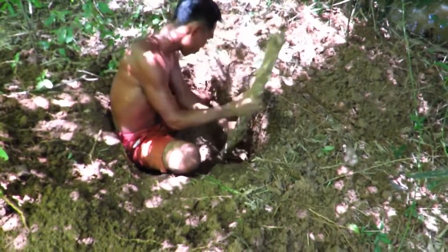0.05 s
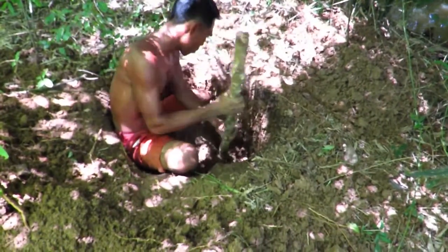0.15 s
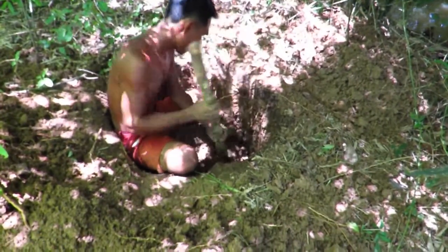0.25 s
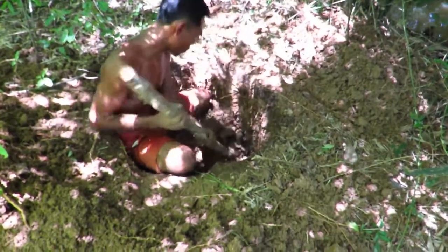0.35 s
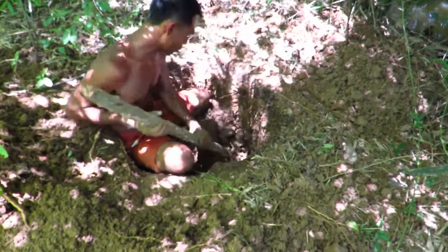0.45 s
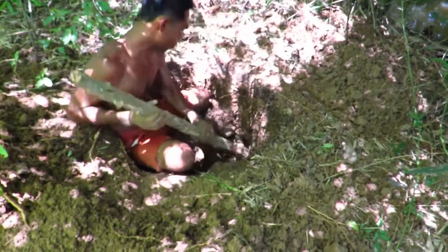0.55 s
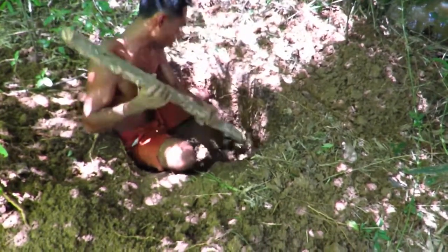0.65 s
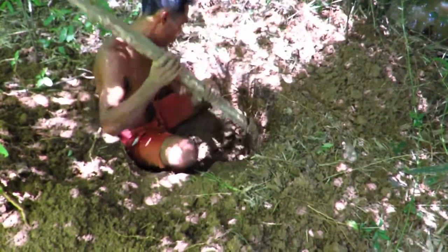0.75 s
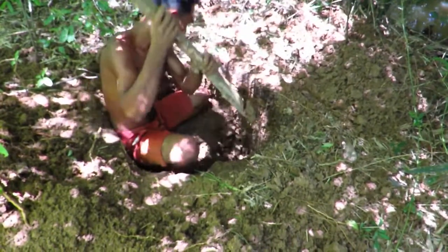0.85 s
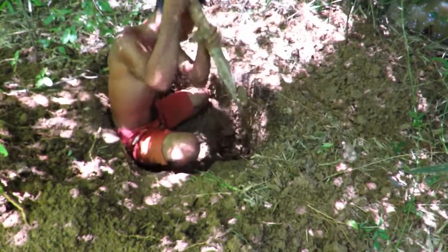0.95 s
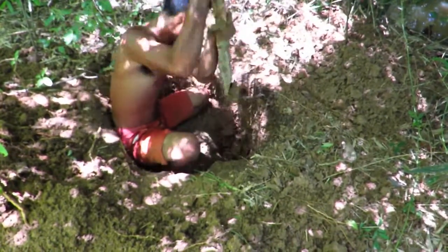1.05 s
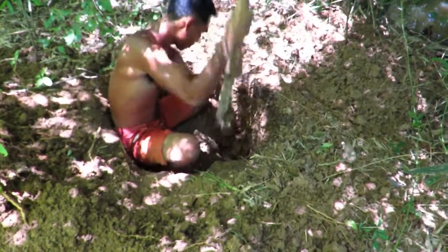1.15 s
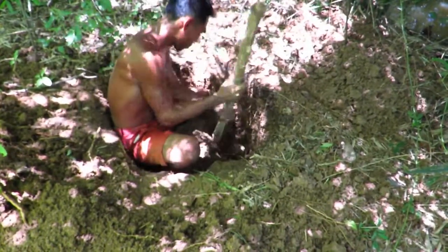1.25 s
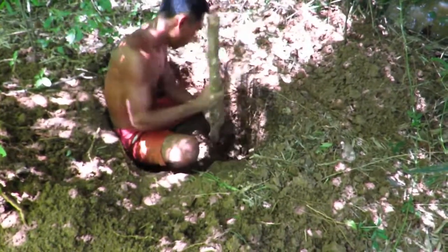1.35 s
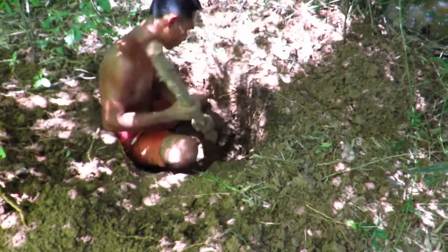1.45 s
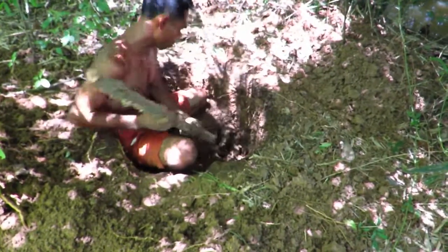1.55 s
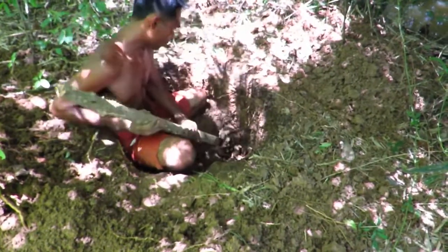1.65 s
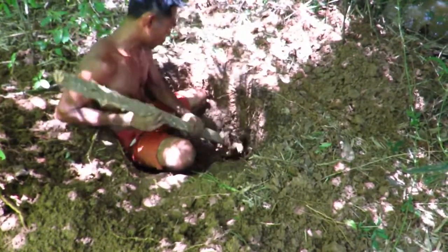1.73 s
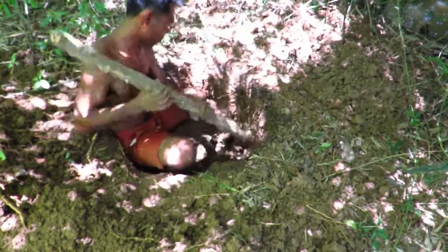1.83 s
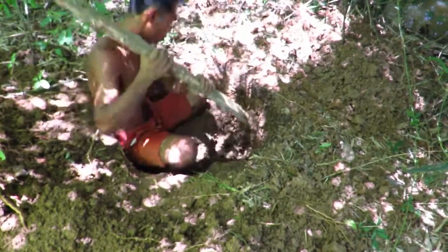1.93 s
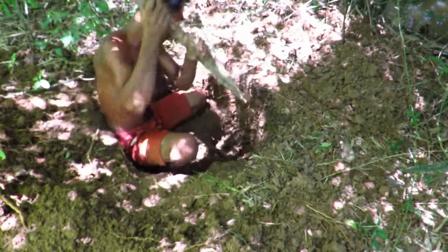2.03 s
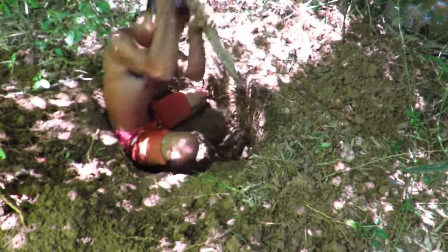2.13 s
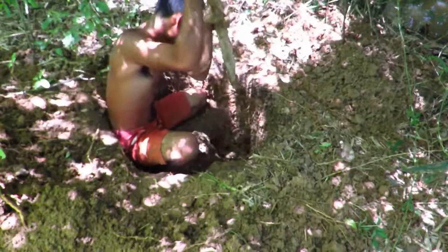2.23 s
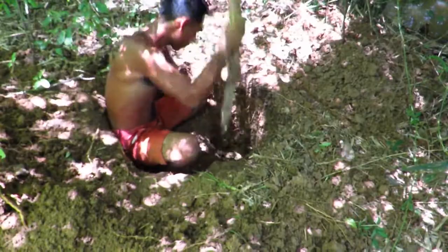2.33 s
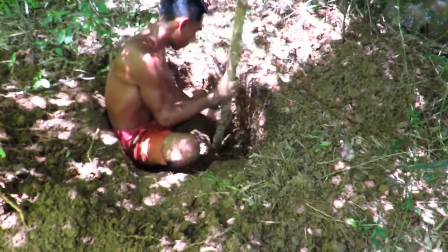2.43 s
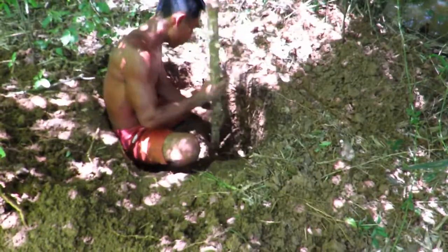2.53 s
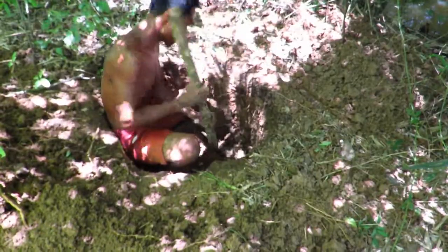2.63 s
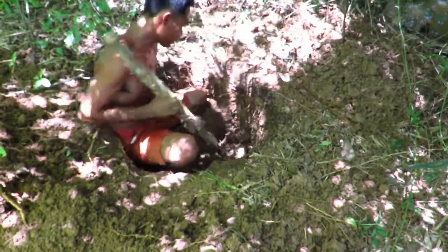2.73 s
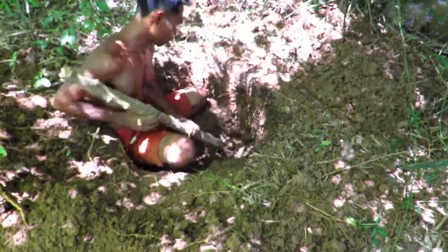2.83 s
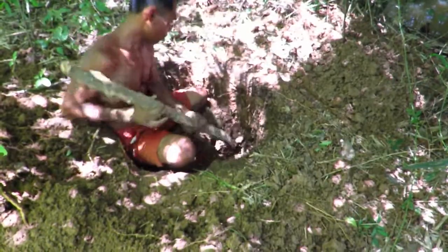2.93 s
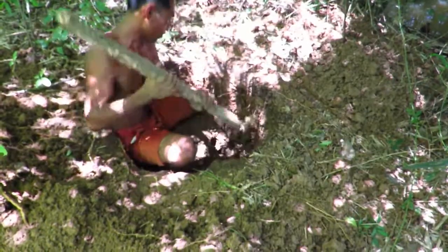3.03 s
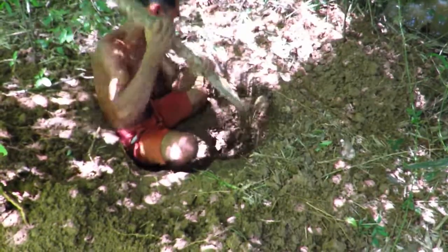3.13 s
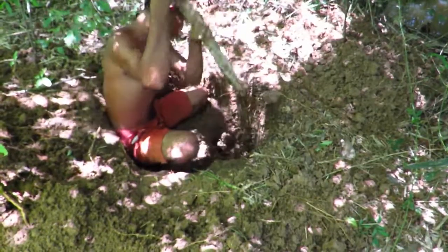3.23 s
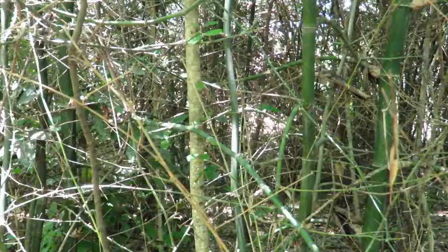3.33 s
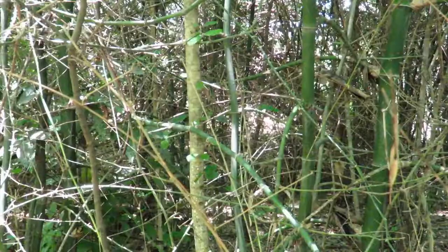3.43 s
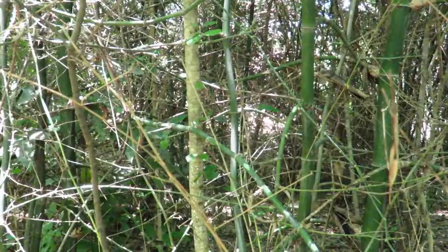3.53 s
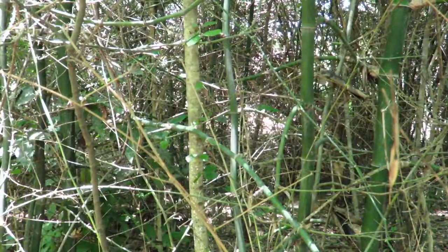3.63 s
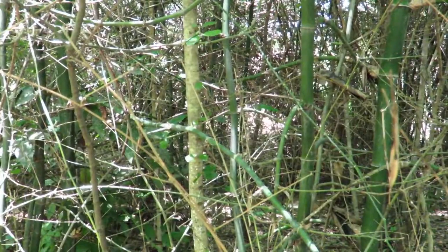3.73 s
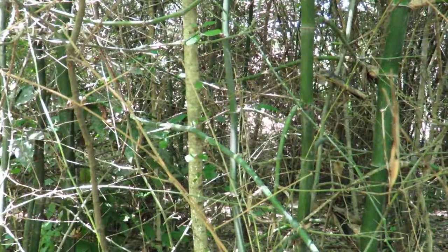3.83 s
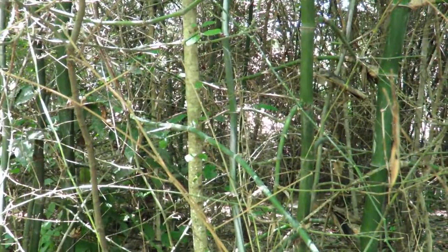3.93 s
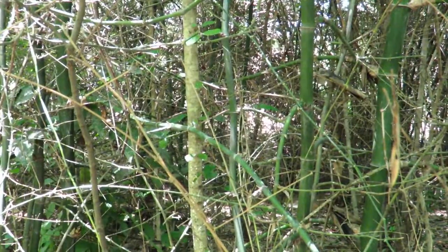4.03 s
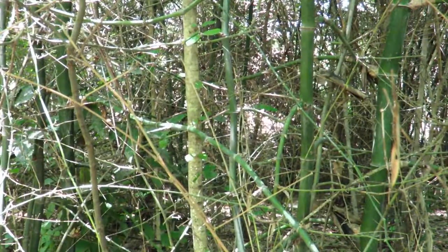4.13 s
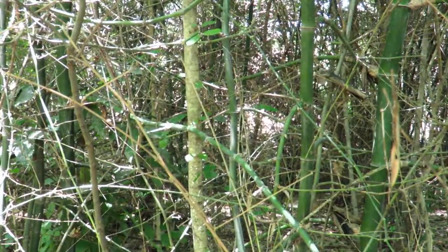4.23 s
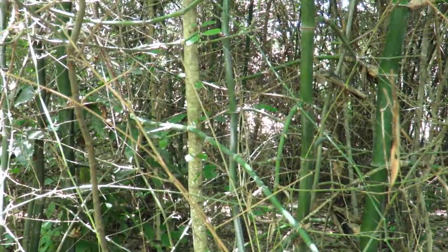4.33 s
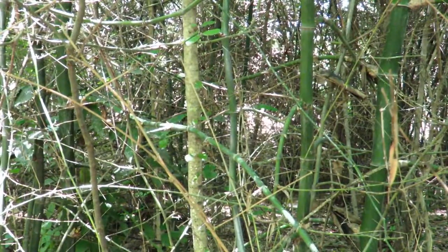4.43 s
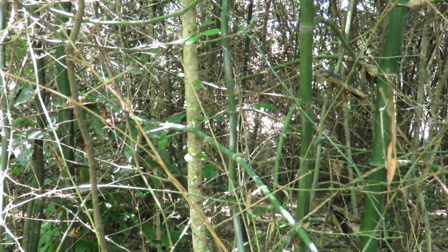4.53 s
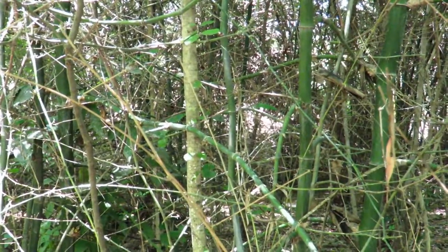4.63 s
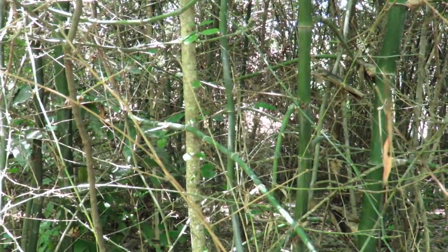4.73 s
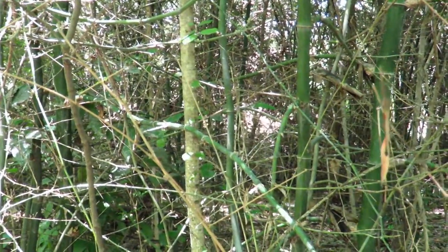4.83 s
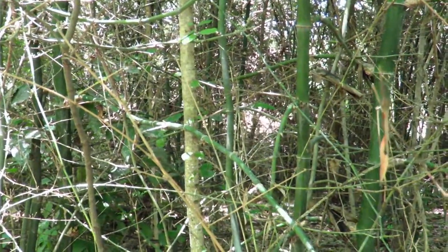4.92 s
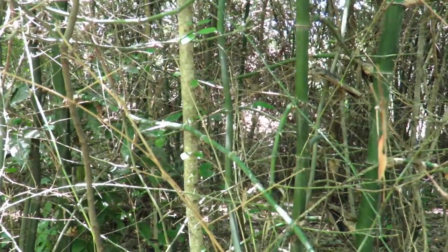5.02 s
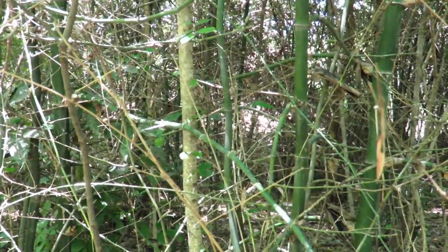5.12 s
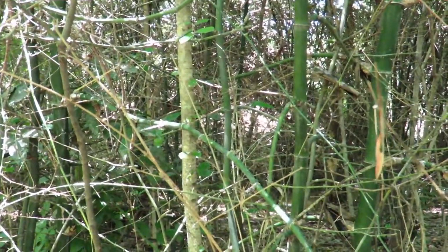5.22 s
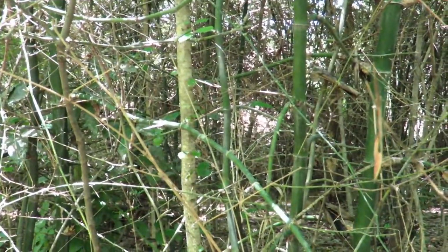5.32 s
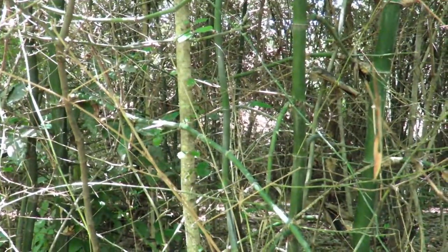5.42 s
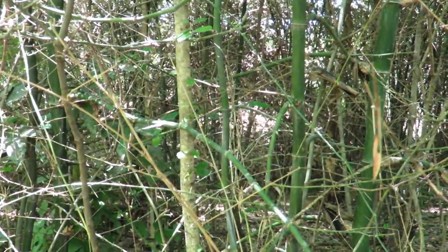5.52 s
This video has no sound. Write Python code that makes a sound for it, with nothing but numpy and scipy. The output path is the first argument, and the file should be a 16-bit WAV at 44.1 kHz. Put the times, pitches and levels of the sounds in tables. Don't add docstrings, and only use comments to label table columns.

```python
import sys
import numpy as np
from scipy import signal
from scipy.fft import rfft, irfft, next_fast_len
from scipy.io import wavfile
from scipy.ndimage import uniform_filter1d

SR = 44100
rng = np.random.default_rng(int(sys.argv[2]) if len(sys.argv) > 2 else 0)


def decibels_to_gain(level_db):
    exponent = np.asarray(level_db, float) / 20
    return 10 ** exponent


def dump_mix(stems):
    frames = np.atleast_2d(stems).T
    limited = np.clip(frames, -1, 1)
    pcm = np.round(limited * 32767).astype(np.int16)
    wavfile.write(sys.argv[1], SR, pcm)


N = 245637
T = np.arange(N) / SR
CUT_S = 3.372
# crest t/s, level/dB, f/Hz, rise t/s
THUMPS = [(0.1435, -26, 186, 0.0019), (0.169, -29.5, 364, 0.0043), (1.319, -20.5, 147, 0.0033),
          (1.3295, -19, 176, 0.004), (1.345, -32, 260, 0.0066), (1.4165, -37.5, 335, 0.0052),
          (2.499, -12.5, 168, 0.0096), (2.5116, -25, 250, 0.0046), (2.519, -20, 161, 0.0068),
          (4.5521, -21.5, 196, 0.009), (5.2424, -31.5, 164, 0.007)]


def crush():
    # peak t/s, wood level/dB, rise t/s, decay t60/s, grit relative level/dB
    crushes = [(0.1371, -30.5, 0.0017, 0.067, -9.5), (0.144, -41.5, 0.0018, 0.078, -6.5),
               (0.164, -35.5, 0.016, 0.068, -15.5), (1.312, -31.5, 0.005, 0.078, -20),
               (1.32, -27, 0.0061, 0.047, -28), (1.327, -26.5, 0.0031, 0.077, -15),
               (2.498, -30, 0.015, 0.046, -26), (2.507, -28, 0.015, 0.033, -11),
               (2.516, -20, 0.0014, 0.028, -19), (4.545, -42, 0.0069, 0.056, -1),
               (4.554, -45.5, 0.0049, 0.045, 6.5), (5.243, -47, 0.0057, 0.059, -16),
               (5.255, -49, 0.0022, 0.11, -10)]
    # t/s, level/dB
    trickles = [
        (.175, -64),
        (1.343, -59),
        (2.524, -55),
        (4.566, -62),
    ]
    # f/Hz, width f/Hz, level/dB
    wood_modes = [(720, 270, -5), (1183, 142, -3.5), (1457, 115, -8), (1555, 400, -5.5), (1770, 300, -9.5),
                  (2070, 410, -10), (2550, 480, -16.5), (3020, 360, -9.5), (3720, 420, -12.5),
                  (4470, 250, -12), (5250, 460, -18)]
    trickle_rise_s, trickle_t60_s, trickle_wood_db = 0.0089, 0.32, -3
    lump_db, lump_t60_s = -12.5, 0.044
    far_cut_hz = 4660

    trickle = swells((s, db, trickle_rise_s, trickle_t60_s) for s, db in trickles)
    wood = swells((s, db, rise, t60) for s, db, rise, t60, _ in crushes)
    wood += decibels_to_gain(trickle_wood_db) * trickle
    grit = trickle + swells((s, db + grit_db, rise, t60) for s, db, rise, t60, grit_db in crushes)
    lumps = swells((s, db + lump_db, rise, lump_t60_s) for s, db, _, rise in THUMPS)

    shifting = grains(2000., 3.0)
    out = cracks() + decibels_to_gain(-0.5) * lumps * rms_one(band(shifting, 193.0, 408.0))
    hiss = band(grit * grains(8300.0, 1.6), 1900.0, 7600.0)
    out += decibels_to_gain(-6) * band(hiss, 1000., 19000.0)
    train = grains(2600., 2.97)
    for k, (hz, width_hz, level_db) in enumerate(wood_modes):
        knocks = np.roll(train, 997 * k)
        push = wood * knocks if hz < 2000 else decibels_to_gain(11) * grit * knocks
        out += (-1) ** k * decibels_to_gain(level_db + 14) * resonate(push, hz, width_hz)
    far = signal.sosfilt(signal.butter(4, far_cut_hz, fs=SR, output="sos"), out)
    return np.where(T < CUT_S, out, far + decibels_to_gain(-9) * out)


def cracks():
    # peak t/s, level/dB, f/Hz
    stones = [(.163, -27.5, 2010), (1.3206, -23, 1150), (1.4143, -38, 1690), (1.5813, -43, 1080),
              (2.5089, -22, 1980), (2.6814, -49, 1300), (4.548, -30.5, 820), (4.5526, -16.5, 3260),
              (5.2525, -33.5, 2330), (5.2527, -37, 3900), (5.254, -38, 980)]
    # f/Hz, level/dB, decay t60/s
    root_modes = [
        (1418, -1, 0.029),
        (2896, -8, 0.025),
        (5900, -9, 0.0053),
        (10440, -13, 0.001),
    ]
    # t/s, peak level/dB, tilt level/dB per octave
    root_hits = [
        (0.1364, -24.5, -15),
        (1.324, -18, -3.5),
        (2.5135, -16.5, 1.7),
    ]
    stone_cycles, stone_rise_cycles, root_rise_cycles = 15, 0.58, 1.78

    rings = [(s, db, hz, stone_cycles / hz, stone_rise_cycles / hz) for s, db, hz in stones]
    for s, db, tilt_db in root_hits:
        for hz, mode_db, t60 in root_modes:
            rise = root_rise_cycles / hz
            level_db = db + mode_db + tilt_db * np.log2(hz / root_modes[0][0])
            rings.append((s + rise, level_db, hz, t60, rise))
    out = np.zeros(N)
    for s, level_db, hz, t60, rise in rings:
        at, age, shape = swell(s, rise, t60)
        out[at] += decibels_to_gain(level_db) * shape * np.cos(2 * np.pi * hz * age)
    return out


def thumps():
    # crest t/s, level/dB, f/Hz
    settles = [
        (.185, -22, 161),
        (1.3622, -29.5, 165),
        (2.5275, -19, 146),
        (4.5686, -18.5, 176),
        (5.2623, -38, 126),
    ]
    settle_rise_s, settle_cycles = 0.0049, 7.3

    blows = [(s, db, hz, rise, 8.3 - 0.2 * (db + 28)) for s, db, hz, rise in THUMPS]
    blows += [(s, db, hz, settle_rise_s, settle_cycles) for s, db, hz in settles]
    out = np.zeros(N)
    for s, level_db, hz, rise, cycles in blows:
        at, age, shape = swell(s, rise, cycles / hz)
        phase = 2 * np.pi * hz * age * (1 - 8.6 * np.clip(age, 0, .03))
        upper = 0.28 * shape * np.cos(1.8 * phase)
        out[at] += decibels_to_gain(level_db) * shape * (np.cos(phase) + upper)
    return out - uniform_filter1d(out, size=800)


def clods():
    # t/s, peak level/dB, f/Hz
    falls = [(0.271, -46, 1160), (0.573, -38, 1380), (0.838, -46, 1170), (1.047, -45, 1110),
             (1.412, -33.5, 1260), (1.493, -38, 1170), (1.58, -36.5, 1100), (1.808, -39.5, 1450),
             (2.416, -44, 4180), (2.447, -38, 1090), (2.678, -34.5, 1320), (2.741, -40.5, 1940),
             (2.874, -44.5, 1400), (3.014, -40.5, 1350), (3.533, -34.5, 3000), (3.811, -44, 1440),
             (4.278, -36.5, 1790), (4.796, -42, 1550)]
    # t/s, peak level/dB
    snaps = [
        (0.8094, -50),
        (2.8794, -49),
        (3.3727, -50),
        (4.089, -38.5),
        (4.1074, -48),
        (4.1214, -52),
        (4.2767, -52),
    ]
    clod_t60_s, snap_t60_s = 0.036, 0.075

    out, puff = np.zeros(N), rng.standard_normal(N)
    bright = rms_one(band(grains(5000., 4.3), 2200.0, 12600.0))
    for s, level_db, hz in falls:
        at, _, shape = swell(s + 0.00055, 0.00064, clod_t60_s)
        out[at] += decibels_to_gain(level_db - 8.0) * shape * rms_one(band(puff[at], 0.47 * hz, 1.11 * hz))
    out = np.array([out, out])
    for s, level_db in snaps:
        at, _, shape = swell(s + 0.0016, .002, snap_t60_s)
        right = 0.82 * bright[at] + .7 * bright[at - 500]
        out[:, at] += decibels_to_gain(level_db - 9.5) * shape * np.array([bright[at], right])
    return out


def birds():
    # t/s, f/Hz, level/dB
    upward = [(3.42, 2580, -80), (3.44, 2720, -54), (3.458, 2970, -36), (3.475, 3170, -38),
              (3.488, 3555, -36.5), (3.496, 4280, -47), (3.502, 4670, -47.5), (3.508, 4830, -68)]
    # t/s, f/Hz, level/dB
    peep = [
        (3.2, 2260, -91),
        (3.23, 2255, -64),
        (3.26, 2250, -89),
    ]
    # t/s, f/Hz, level/dB
    falling = [
        (4.71, 1550, -75),
        (4.735, 1400, -62),
        (4.78, 1147, -63),
        (4.815, 1020, -75),
    ]

    near = whistle(*note(upward), rough_db=1.5)
    near_echo = decibels_to_gain(-3.5) * forest(near, t60=0.34, low_hz=2920.0, high_hz=9100.0)
    faint = whistle(*arch(), rough_db=4.5) + whistle(*note(peep), rough_db=6.0)
    fall_phase = 2 * np.pi * np.cumsum(curve(falling, outside=1000)) / SR
    faint = faint + np.sqrt(2) * decibels_to_gain(curve(falling, column=2)) * np.sin(fall_phase)
    return near + near_echo + faint + decibels_to_gain(-9) * forest(faint, t60=0.41, low_hz=1500., high_hz=9000.)


def whistle(hz, level_db, rough_db):
    flutter = decibels_to_gain(rough_db * rms_one(band(rng.standard_normal(N), 40., 280.0)))
    return np.sqrt(2) * decibels_to_gain(level_db) * flutter * np.sin(2 * np.pi * np.cumsum(hz) / SR)


def note(rows):
    return curve(rows, outside=2600), curve(rows, column=2)


def arch():
    # start t/s, end t/s, top t/s, top f/Hz, sag f/Hz per s squared
    arching = (4.05, 4.27, 4.18, 4830, 30000)
    # t/s, added level/dB
    accents = [
        (4.074, 6),
        (4.134, 6),
        (4.212, 14),
    ]
    level_db, edge_s, accent_s = -68, 0.026, 0.007

    start, end, top, top_hz, sag = arching
    edge = np.clip(np.minimum(T - start, end - T) / edge_s, 1e-4, 1)
    stress_db = sum(db * np.exp(-.5 * ((T - s) / accent_s) ** 2) for s, db in accents)
    hz = top_hz - sag * (np.clip(T, start, end) - top) ** 2
    return hz, level_db + 20 * np.log10(edge) + stress_db


def leaves():
    # t/s, level/dB, rise t/s, decay t60/s
    brushes = [
        (2.06, -63, 0.047, 0.17),
        (.83, -72, .03, .15),
        (3.40, -73, 0.022, 0.17),
        (3.81, -61, 0.009, 0.082),
        (4.12, -56, .01, 0.067),
        (4.29, -54, 0.062, 0.27),
        (5.54, -65, 0.021, .2),
    ]
    rustle_db, fade_db_per_s = -50, 6

    bed = decibels_to_gain(rustle_db - 7.5 - fade_db_per_s * (T - CUT_S)) * (T > CUT_S)
    mid, side = [rms_one(band(grains(4000., 1.6), 1000.0, 5720.0)) for _ in range(2)]
    return (bed + swells(brushes)) * (mid + 0.23 * side * [[1], [-1]])


def insects():
    out = trill() + crickets()
    return out + decibels_to_gain(-11) * forest(out[0], t60=0.09, low_hz=5000., high_hz=12400.0)


def trill():
    throb = 1 + .5 * np.sin(2 * np.pi * 78. * T + 2 * drift(6.0))
    lower = resonate(rng.standard_normal((2, N)), 6670.0, 260.)
    return trill_level() * throb * rms_one(resonate(lower, 6840.0, 280.))


def trill_level():
    # full voice t/s, length t/s, level/dB
    phrases = [
        (0.368, 0.16, -66.5),
        (1.556, 0.16, -66),
        (2.725, 0.15, -66),
        (4.30, .15, -70.5),
        (5.54, .1, -73),
    ]
    swell_db_per_s, fade_db_per_s = 150, 150
    warmup_s, warmup_db = 0.27, -8
    beats_per_s, beat_depth_db = 15.6, 2

    out = 0
    for s, length, db in phrases:
        early, late = np.maximum(s - T, 0), np.maximum(T - s - length, 0)
        rise_db = warmup_db * np.minimum(early / .03, 1)
        rise_db -= swell_db_per_s * np.maximum(early - warmup_s, 0)
        beat_db = beat_depth_db * np.cos(2 * np.pi * beats_per_s * (T - s - .01))
        out = out + decibels_to_gain(db + rise_db + beat_db - fade_db_per_s * late)
    return out


def crickets():
    # start t/s, length t/s, peak level/dB
    chirps = [
        (1.714, .05, -52.5),
        (1.782, .01, -62),
        (1.837, .01, -62),
        (3.505, .03, -50.5),
        (3.617, .086, -50.5),
        (3.718, .01, -58),
        (4.367, .03, -56.5),
        (4.8683, .01, -56),
        (5.314, .01, -50),
    ]
    stroke_gap_s, stroke_s = .019, 0.017
    stroke_hz, spread_hz, spread_db = 9860, 57, 1

    strokes = []
    for start, length, db in chirps:
        strokes += [(s, db) for s in np.arange(start, start + length, stroke_gap_s)]
    out = np.zeros((2, N))
    for (s, level_db), (sharp, loud) in zip(strokes, rng.standard_normal((60, 2))):
        at = np.arange(round(s * SR), round((s + stroke_s) * SR))
        age = at / SR - s
        hz = stroke_hz + spread_hz * sharp
        tone = np.sin(2 * np.pi * hz * age * (1.012 - 1.0 * age))
        tone *= 1 + .6 * np.sin(2 * np.pi * 320.0 * age)
        shape = np.hanning(len(at)) ** 0.37
        out[:, at] += decibels_to_gain(level_db - 7.0 + spread_db * loud) * shape * tone * decibels_to_gain([[1.5], [-1.5]])
    return out


def engine():
    level_db, fade_db_per_s, waver_db = -51.5, 1, 1.5
    tone = drones([(56.6, 7.6, -4.0, 0.022)])
    steady = decibels_to_gain(level_db - fade_db_per_s * (T - CUT_S) + waver_db * drift(8.9))
    surge = swells([(3.43, -41, .05, 0.67)])
    return (steady + surge) * tone


def pit_background():
    # f/Hz, level/dB per Hz
    spectrum = [(25, -38), (50, -6.5), (90, -8.5), (200, -4.5), (400, -9.5), (800, -13), (1300, -21.5),
                (3000, -27), (5500, -33), (7700, -38.5), (9000, -30), (10600, -32), (12000, -43),
                (15500, -50)]
    # f/Hz, correlation
    likeness = [(60, 0.99), (130, 0.89), (290, -0.19), (640, -0.61), (1410, -0.048), (3100, -0.096),
                (6820, 0.1), (15000, 0.091)]
    # f/Hz, width f/Hz, level/dB, side share 0-1
    far_tones = [(48.8, 6.1, -64, 0.06), (90.8, 8.3, -54, 0.04), (184.6, 4.84, -61, 0),
                 (252, 7.9, -69.5, 1), (675, 48.4, -67.5, 0.48), (1029, 10, -62.5, 0.35)]
    return decibels_to_gain(-48.5) * air(spectrum, likeness, patchy_db=0.94) + drones(far_tones)


def thicket_background():
    # f/Hz, level/dB per Hz
    spectrum = [(25, -23), (50, -9), (85, -6.5), (130, -6.5), (250, -7.5), (800, -13), (1300, -21),
                (4200, -27.5), (6000, -35), (7700, -35.5), (9500, -32.5), (10800, -35.5), (12000, -41),
                (15500, -48)]
    # f/Hz, correlation
    likeness = [(60, 0.99), (130, 0.89), (290, -0.37), (640, -0.28), (1410, 0.11), (3100, 0.48),
                (6820, 0.4), (15000, -0.15)]
    # f/Hz, width f/Hz, level/dB, side share 0-1
    far_tones = [(116.4, 7.54, -55, 0.033), (165, 12.7, -65, 0.17), (193.3, 3.83, -65.5, 0.46)]
    return decibels_to_gain(-47.5) * air(spectrum, likeness, patchy_db=1.65) + drones(far_tones) + engine()


def air(spectrum, likeness, patchy_db):
    out, edges = 0, 20 * 2 ** np.arange(0, 10.1, .5)
    white = rng.standard_normal((2, 2, N))
    together = drift(2.0)
    for k, (low, high) in enumerate(zip(edges, edges[1:])):
        mid, side = band(white[k % 2], low, high)
        alike = np.clip(at_hz(likeness, np.sqrt(low * high)), -1, 1)
        gain = decibels_to_gain(patchy_db * (0.12 * together + drift(30.0)))
        out = out + gain * (np.sqrt(1 + alike) * mid + np.sqrt(1 - alike) * side * [[1], [-1]])
    size = next_fast_len(N)
    colour = decibels_to_gain(at_hz(spectrum, (np.arange(size // 2 + 1) + 1) * SR / size))
    return rms_one(irfft(rfft(out, size) * colour, size)[:, :N])


def drones(lines):
    out = 0
    for hz, width_hz, level_db, side_share in lines:
        phase = 2 * np.pi * np.cumsum(hz + .5 * width_hz * drift(25.0)) / SR
        apart = np.clip(side_share, 0, 1) * (1 + .5 * drift(2.66)) * [[1], [-1]]
        gain = decibels_to_gain(level_db + 0.91 * np.log(hz / 20) * drift(18.0))
        out = out + np.sqrt(2) * gain * np.sin(phase + apart)
    return out


def forest(x, t60, low_hz, high_hz):
    age = np.arange(SR // 2) / SR
    tail = band(rng.standard_normal((2, SR // 2)), low_hz, high_hz)
    tail = tail * decibels_to_gain(-60 * age / t60) * (1 - np.exp(-age / 0.00096))
    tail[1] = 0.69 * tail[0] + 0.81 * tail[1]
    return signal.fftconvolve(x[None], tail / np.sqrt(np.sum(tail ** 2) / 2), axes=1)[:, :N]


def swell(s, rise, t60):
    at = np.arange(max(round((s - rise) * SR), 0), min(round((s + 1.5 * t60) * SR), N))
    age = at / SR - s
    return at, age, np.where(age < 0, np.cos(np.pi / 2 * age / rise) ** 2, decibels_to_gain(-60 * age / t60))


def swells(rows):
    out = np.zeros(N) + 1e-9
    for s, level_db, rise, t60 in rows:
        at, _, shape = swell(s, rise, t60)
        out[at] += decibels_to_gain(level_db) * shape
    return out


def grains(per_s, spread_db):
    sizes = decibels_to_gain(spread_db * np.minimum(rng.exponential(1, N), 4)) * rng.choice([-1, 1], N)
    return rms_one(sizes * (rng.random(N) < per_s / SR))


def drift(rate):
    points = uniform_filter1d(rng.standard_normal(600), size=3)
    return np.interp(T * rate * 3, np.arange(600), rms_one(points))


def resonate(x, hz, width_hz):
    r = np.exp(-np.pi * width_hz / SR)
    poles = [1, -2 * r * np.cos(2 * np.pi * hz / SR), r * r]
    return signal.lfilter(np.array([1, 0, -1]) * (1 - r * r) / 2, poles, x)


def band(x, low_hz, high_hz):
    sos = signal.butter(2, [low_hz, min(high_hz, .45 * SR)], "band", fs=SR, output="sos")
    return signal.sosfilt(sos, x)


def rms_one(x):
    return x / np.sqrt(np.mean(x ** 2) + 1e-20)


def curve(table, column=1, outside=-120):
    rows = np.array(table)
    return np.interp(T, rows[:, 0], rows[:, column], outside, outside)


def at_hz(points, hz):
    points = np.array(points)
    return np.interp(np.log(hz), np.log(points[:, 0]), points[:, 1])


def scene():
    pole = crush()
    pole_echo = decibels_to_gain(-24.5) * forest(pole, t60=0.24, low_hz=287.0, high_hz=11000.0)
    near = pole + clods() + thumps() + pole_echo
    background = np.where(T < CUT_S, pit_background(), thicket_background())
    return near + birds() + insects() + leaves() + background


def top_cut(x):
    return signal.sosfilt(signal.butter(12, 15730, fs=SR, output="sos"), x)


def record(dry):
    x = signal.sosfilt(signal.butter(3, 42., "high", fs=SR, output="sos"), dry)
    x = signal.sosfilt(signal.cheby2(12, 60, 16000, fs=SR, output="sos"), x)
    return top_cut(x)


dry = scene()
out = record(dry)
dump_mix(out)
```